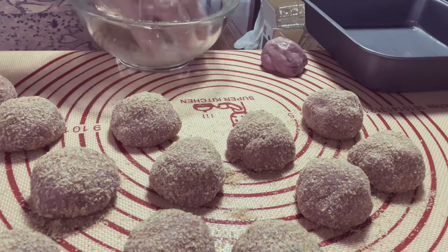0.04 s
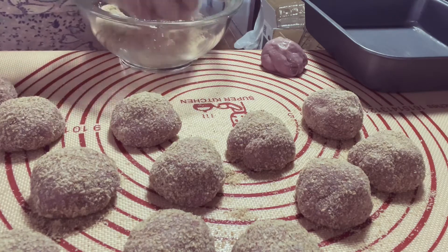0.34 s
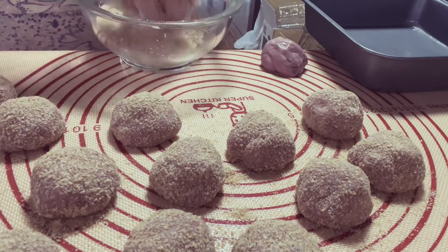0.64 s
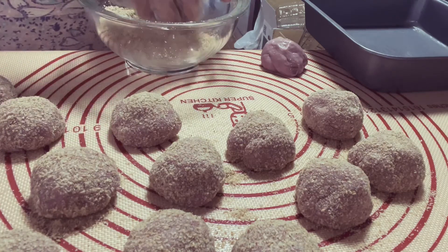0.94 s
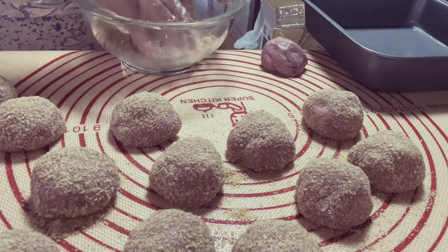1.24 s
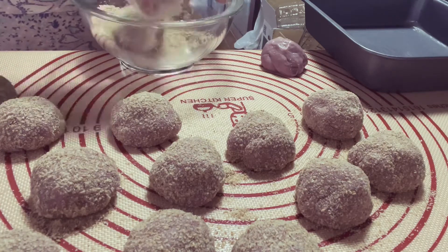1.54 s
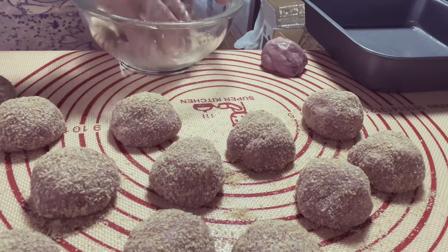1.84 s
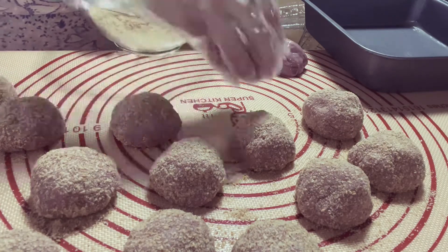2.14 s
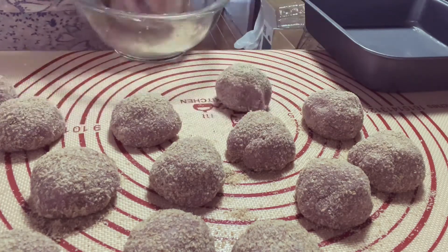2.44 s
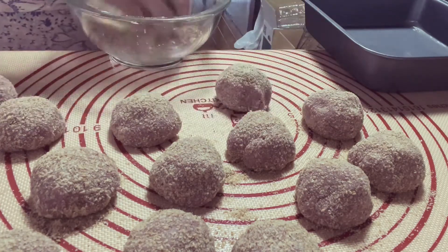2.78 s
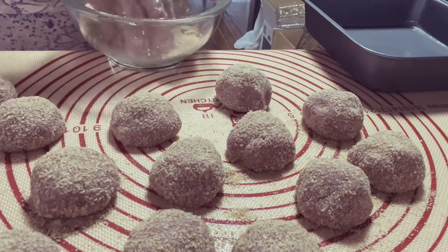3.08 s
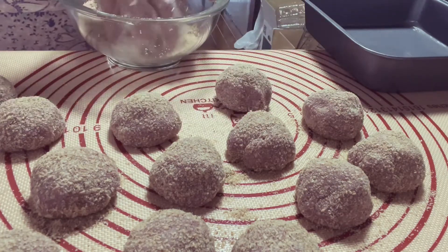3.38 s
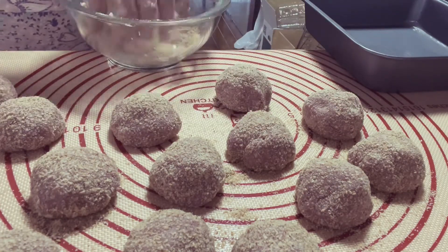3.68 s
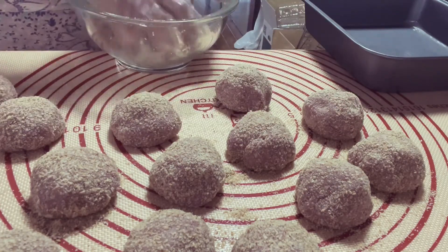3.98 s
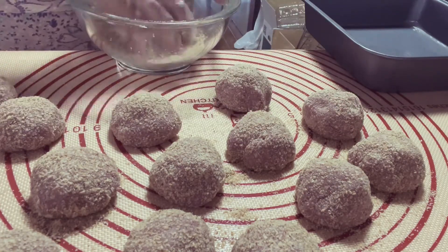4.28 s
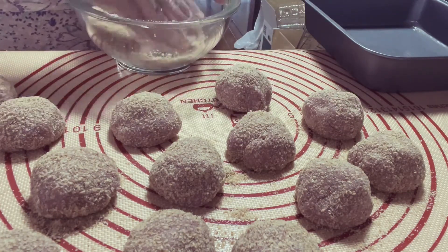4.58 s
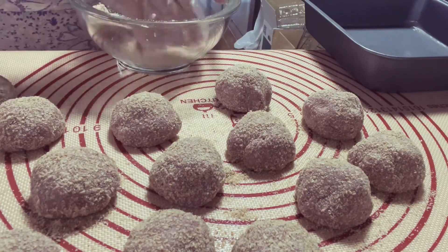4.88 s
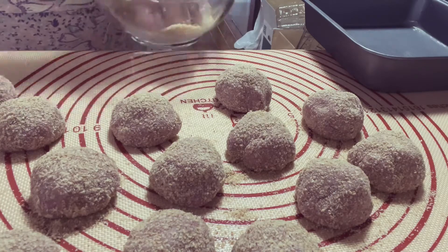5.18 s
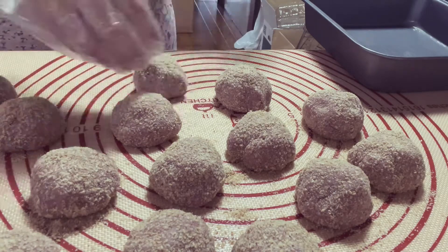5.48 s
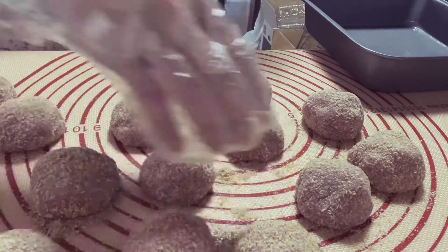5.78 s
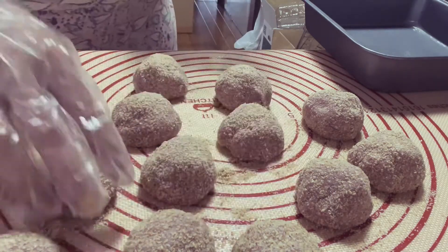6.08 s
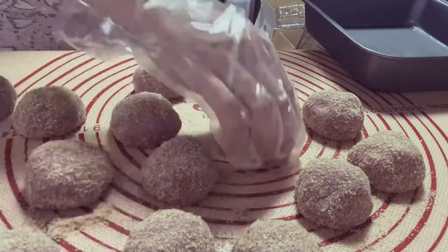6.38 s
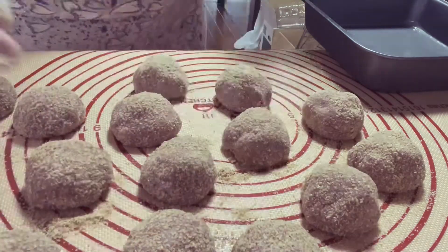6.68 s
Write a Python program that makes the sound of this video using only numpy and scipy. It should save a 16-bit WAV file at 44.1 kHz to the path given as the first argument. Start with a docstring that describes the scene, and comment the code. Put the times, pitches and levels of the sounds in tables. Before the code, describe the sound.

A quiet, close kitchen sound with almost no echo, over a faint low hum and hiss. From the start, a dough ball is rolled in dry crumbs in a glass bowl: soft, uneven hissing and grinding with tiny crunches. The bowl rocks on a baking mat, making irregular dull knocks. These cluster between about 0.3 and 1.1 seconds, with the loudest, a harder clack, at 0.7. A double bump comes at 2.1 seconds, then a small plastic glove snap and a faint glass ping around 2.4. The rubbing and gentle knocking continue until about 5.2 seconds. At 5.3 the bowl is pushed aside with a knock and a light slap, followed by a soft thud at 5.6. From 5.4 until the end, near 6.8 seconds, the thin plastic glove rustles in short bursts with crisp little crinkles and snaps.

```python
"""In a quiet kitchen, a gloved hand rolls a dough ball in breadcrumbs in a glass bowl on a baking mat.
Friction and countless tiny fractures make the crumbs hiss and crunch; a few hard ones ping the glass.
The bowl rocks and knocks dully through the mat, exciting its own damped modes and those of the table.
Then the bowl is pushed aside, and the thin plastic glove buckles and rustles as the balls are set down."""
import sys
import numpy as np
from scipy import signal
from scipy.fft import rfft, irfft
from scipy.io import wavfile
from scipy.ndimage import uniform_filter1d

SR = 44100
rng = np.random.default_rng(int(sys.argv[2]) if len(sys.argv) > 2 else 0)


def generate_wav(signal):
    """Clip the signal to [-1, 1] and save it as 16-bit WAV at the path in sys.argv[1]."""
    frames = np.transpose(np.atleast_2d(signal))
    scaled = np.clip(frames, -1, 1) * 32767
    pcm = np.round(scaled).astype(np.int16)
    wavfile.write(sys.argv[1], SR, pcm)


N = 301203
TIME, FREQS = np.arange(N) / SR, np.fft.rfftfreq(N, 1 / SR)

# pushes of the hand that roll the ball: start_s, length_s, effort_db, extra_pressure_db
PUSHES = [(0.0, 0.1, -68, -2.5), (0.1, 0.08, -74, -4), (0.183, 0.051, -62, 0), (0.25, 0.24, -68, 0),
          (0.595, 0.11, -69.5, 0), (0.72, 0.12, -67, 1.5), (0.84, 0.17, -72.5, -3.5),
          (0.885, 0.036, -66, -0.5), (0.995, 0.11, -72, 0), (1.12, 0.86, -74.5, 0.5),
          (1.475, 0.046, -61.5, 0), (1.585, 0.2, -68, -1), (1.77, 0.12, -72.5, -2.5),
          (1.96, 0.021, -66.5, 0), (2.165, 0.076, -74, 1), (2.255, .07, -67, 1.5), (2.39, 0.31, -67, -1.5),
          (2.615, .045, -63, -1), (2.72, 0.11, -66.5, -1), (2.875, 0.017, -59.5, 2),
          (2.84, 0.52, -72.5, -1), (3.385, 0.26, -70, -6), (3.488, 0.061, -65.5, 0),
          (3.655, 0.17, -65.5, -1.5), (3.845, 0.25, -69.5, 2), (4.105, 0.33, -67.5, -0.5),
          (4.45, .31, -69.5, -1.5), (4.785, 0.21, -69, -2.5), (5.06, 0.19, -75, -1)]
# faint stirring of the crumbs under the ball: start_s, length_s, effort_db, extra_pressure_db
RESTING_CONTACT = [(0, 5.7, -82.5, -2.7)]
# blows of bowl and dough on the table: time_s, thud_db, bowl_db, clack_db
BLOWS = [(0.194, -71, -63.5, -62), (0.311, -61, -59.5, -74), (0.422, -58, -53.5, -59.5),
         (0.45, -52.5, -39, -69), (0.635, -51, -39.5, -59.5), (0.7364, -48.5, -28.5, -32),
         (0.785, -53.5, -69, -74), (0.845, -50, -42, -61), (0.892, -61, -57, -68),
         (0.917, -51.5, -44.5, -63), (1.033, -52.5, -39.5, -57.5), (1.144, -57.5, -54.5, -80),
         (1.479, -54.5, -58, -65), (1.713, -57.5, -53.5, -78), (1.892, -57, -87, -66),
         (2.103, -78, -59, -73), (2.123, -50, -47.5, -70), (2.1355, -44.5, -42, -77),
         (2.243, -55, -56, -59.5), (2.408, -48.5, -54, -82), (2.635, -58.5, -59, -81),
         (2.737, -58, -52.5, -81), (2.837, -53, -54, -83), (2.892, -56.5, -89, -87),
         (2.958, -54.5, -46.5, -68.5), (3.675, -50, -48.5, -59), (3.7, -56, -50, -86),
         (3.752, -59, -66, -75), (3.882, -60, -54, -71), (4.071, -55.5, -57, -70), (4.3245, -48, -58, -83),
         (4.631, -65.5, -63, -67), (4.723, -50, -73, -65), (4.797, -55.5, -57, -66),
         (5.328, -49.5, -37.5, -56), (5.383, -51.5, -67, -60), (5.6135, -45, -68, -68),
         (5.716, -61, -78, -64)]
# modes of the table top: pitch_hz, level_db, t60_s, left_over_right_db, left_lead_rad
TABLE_MODES = [(145, -15.5, 0.044, 2, 0.41), (247.4, 4.5, 0.093, -1, -0.15), (354, 4.5, 0.059, -1.5, -0.73),
               (447, 6.5, 0.027, -14, 0.35)]
# modes of the bowl on the mat: pitch_hz, level_db, t60_s, left_over_right_db, left_lead_rad
BOWL_MODES = [(596, -11, .06, -1, 1.5), (678, 0, .105, 4, .6), (722, -17, .06, 0, -.1),
              (835, -9, .028, -4, 0), (1040, -10, .022, -4, 1.5)]
ROCK_S, SETTLED_SHARE = .0185, .45  # how long the bowl rocks; amplitude share that rings on afterwards


def amp(db):
    """Decibels to amplitude ratio."""
    return 10 ** (np.asarray(db) / 20)


def unit(x):
    """Normalisation to rms 1."""
    return x / np.sqrt(np.mean(x ** 2) + 1e-20)


def read(points, hz):
    """Interpolation on a logarithmic frequency axis."""
    f, value = np.transpose(points)
    return np.interp(np.log(hz + 1), np.log(f), value)


def add(mix, start_s, sound):
    """Superposition of a stereo sound on the mix."""
    part = mix[:, max(round(start_s * SR), 0):][:, :sound.shape[1]]
    part += sound[:, :part.shape[1]]


def colour(x, spectrum):
    """Spectral shaping that conserves the power of white input."""
    return irfft(rfft(x) * unit(amp(read(spectrum, FREQS))), N)


def noise_pair(correlation):
    """Partial coherence: left and right white noise share a common part."""
    common, independent = rfft(rng.standard_normal((2, N)))
    c = np.clip(correlation, -1, 1)
    return irfft(np.array([common, c * common + np.sqrt(1 - c ** 2) * independent]), N)


def wander(hz):
    """Low-pass noise: a slow random fluctuation of rms 1."""
    return unit(irfft(rfft(rng.standard_normal(N)) / (1 + (FREQS / hz) ** 4), N))


def grains(per_s, spread_db, clump_db, clump_hz, correlation):
    """Shot noise: tiny fractures, each a sub-millisecond burst, swelling in clumps."""
    sizes = amp(spread_db * np.minimum(rng.exponential(1, N), 5))
    arrivals = rng.random(N) < per_s / SR
    burst = np.exp(-np.arange(100) / 9)
    power = np.convolve((sizes * arrivals) ** 2, burst)[:N]
    return unit(noise_pair(correlation) * np.sqrt(power) * amp(clump_db * wander(clump_hz)))


def gestures(moves, attack_s=0.012, release_s=0.018, sag_db=1.8):
    """Envelope of sustained forcing: each move swells, sags and dies away; the strongest leads."""
    out = np.zeros(N)
    for start, length, db, *_ in moves:
        t = TIME - start
        swell = np.clip(t / attack_s, 0, 1)
        fade = np.exp(-np.maximum(t - length, 0) / release_s)
        out = np.maximum(out, swell * fade * amp(db - sag_db * np.clip(t / length, 0, 1)))
    return out


def bursts(events, rise_s):
    """Envelope of transient slips: a quick rise, then exponential decay."""
    out = np.zeros(N)
    for s, db, decay_s in events:
        t = np.maximum(TIME - s + rise_s, 0)
        out += amp(db) * (1 - np.exp(-t / rise_s)) * np.exp(-t / max(decay_s, .001))
    return out


def kitchen_noise(murk_db=-64.48, air_db=-77, swell_db=1.55):
    """Ambient noise: a slowly swelling low murmur, most coherent in the bass, and a faint even hiss."""
    # spectrum of the murmur: frequency_hz, density_db
    murk_spectrum = [(18, -88), (30, -33), (136, -14.5), (189, -3), (302, -0.5), (329, -10), (392, -1.5),
                     (482, -1), (604, -7.5), (648, -10), (694, -4), (885, -8), (1070, -2.5), (1250, -13.5),
                     (1900, -15), (2470, -97), (4180, -120)]
    # coherence of left and right: frequency_hz, correlation
    coherence = [(40, 0.69), (130, 1), (300, 0.82), (640, 0.77), (1400, 0.46), (3000, 0)]
    air_spectrum = [(1000, -7), (2300, 7.5), (3600, 8.0), (4500, 1.5), (9000, -8.0), (15000, -42.0)]
    murk = colour(noise_pair(read(coherence, FREQS)), murk_spectrum) * amp(swell_db * wander(0.56))
    air = colour(noise_pair(0), air_spectrum)
    return amp(murk_db) * murk + amp(air_db) * air


def moving_contact(x, patchy_db):
    """Time-varying filtering: as the contact patch moves, the colour of the rubbing shifts."""
    spectra = signal.stft(x, SR, nperseg=256)[2]
    patches = rng.standard_normal(spectra.shape[1:])
    for size, axis in ((4, 0), (6, 0), (4, 1), (6, 1)):  # smooth over frequency, then time
        patches = uniform_filter1d(patches, size, axis)
    return signal.istft(spectra * amp(patchy_db * unit(patches)), SR, nperseg=256)[1][:, :N]


def bowl_resonance(x):
    """Forced resonance: the glass and the air in the bowl favour a few narrow bands."""
    # resonances driven by the rubbing: centre_hz, width_hz, lift_db
    peaks = [(671, 61, 15), (2660, 60, 4.5), (3610, 140, 3.5), (4155, 80, 2.5), (5740, 140, 3.5),
             (6600, 270, 5.5), (10900, 700, 3)]
    lift_db = sum(db / (1 + (2 * (FREQS - hz) / width) ** 2) for hz, width, db in peaks)
    return irfft(rfft(x) * amp(lift_db), N)


def crumbs(hiss_db=1.24, grind_db=-1.0, crunch_db=-5, crunch_hiss_db=-6):
    """Friction and brittle fracture: loose crumbs hiss on the glass, pressed ones grind lower."""
    # crumbs giving way under the ball: time_s, level_db, decay_s
    crunches = [(0.0862, -56.5, 0.0098), (0.197, -58, 0.0073), (0.6225, -47, 0.0038),
                (0.7257, -49.5, 0.0071), (0.7355, -57, 0.015), (1.0101, -64.5, 0.021),
                (1.593, -59.5, 0.012), (2.2408, -51, 0.0073), (2.405, -61, 0.006), (2.586, -58, 0.0051),
                (2.7567, -50, 0.0079), (3.755, -59.5, 0.021), (3.895, -53, 0.0053), (4.064, -57, 0.0079),
                (5.3815, -56, 0.0097)]
    # spectra of sliding and of pressed crumbs: frequency_hz, density_db
    hiss_spectrum = [(2200, -12), (3000, 5), (4500, -2.5), (5200, -3.5), (5700, 0.5), (6150, -5),
                     (6700, 0.5), (7300, -2.5), (9500, -0.5), (11000, 0.5), (13500, 0), (15700, -2.5)]
    grind_spectrum = [(200, -17.5), (1000, -4), (1900, -8.5), (2400, -8.5), (2750, -2.5), (3200, -2),
                      (3700, 1), (4100, -8.5), (4800, -11.5), (9000, -39)]
    moves = PUSHES + RESTING_CONTACT
    uneven = amp(.9 * wander(14))
    effort = uneven * gestures(moves)
    pressure = uneven * gestures([(s, length, db + press) for s, length, db, press in moves])
    slips = bursts(crunches, rise_s=0.0012)
    fine = grains(per_s=9000, spread_db=1.0, clump_db=.8, clump_hz=60, correlation=0.38)
    coarse = grains(per_s=110, spread_db=2, clump_db=2, clump_hz=20, correlation=0.38)
    pressed = grains(per_s=5500, spread_db=0, clump_db=1.5, clump_hz=49.3, correlation=0.42)
    hiss = (fine + .42 * coarse) * (amp(hiss_db) * effort + amp(crunch_hiss_db) * slips)
    grind = pressed * (amp(grind_db) * pressure + amp(crunch_db) * slips)
    rubbing = colour(hiss, hiss_spectrum) + colour(grind, grind_spectrum)
    return bowl_resonance(moving_contact(rubbing, patchy_db=1.9))


def scuffs(scuff_db=-19.5, roll_db=-2, lead_s=.007, decay_s=.014):
    """Rolling and sliding friction: the ball rumbles, and the bowl's foot scuffs the mat at each blow."""
    # spectrum of the dull rub: frequency_hz, density_db
    rub_spectrum = [(30, -46), (100, -12.5), (230, 0.5), (450, 1), (560, -5), (680, 0), (800, -6),
                    (1100, -14), (1500, -10.5), (2500, -46)]
    slides = bursts([(s - lead_s, max(thud, bowl), decay_s) for s, thud, bowl, _ in BLOWS], rise_s=0.0046)
    rolling = gestures(PUSHES + RESTING_CONTACT)
    return colour(noise_pair(0.84), rub_spectrum) * (amp(scuff_db) * slides + amp(roll_db) * rolling)


def softened(modes, cutoff_hz):
    """Contact time acts as a low-pass filter: a longer contact leaves out the high modes."""
    return [(hz, db - 10 * np.log10(1 + (hz / cutoff_hz) ** 8), *rest) for hz, db, *rest in modes]


def ring(modes, rise_s, detune, pitch=1, droop=0, settled=SETTLED_SHARE, bass_lag=0):
    """Free vibration of damped modes, detuned by the hand's load and drooping as the bowl settles."""
    t = np.arange(SR // 6) / SR
    side = np.array([[.5], [-.5]])
    out = np.zeros((2, len(t)))
    glide = pitch * (1 - droop * (1 - np.exp(-(t / ROCK_S) ** 2)))
    clock = np.cumsum(glide) / SR
    for k, (hz, db, t60, pan_db, lead) in enumerate(modes):
        phase = 2 * np.pi * hz * (1 + detune * rng.standard_normal()) * clock
        # the soft mat slows the attack; with bass_lag, most for the lowest mode
        attack = 1 - np.exp(-(t / rise_s * (hz / modes[0][0]) ** bass_lag) ** 2)
        decay = np.exp(-np.log(1000) * t / t60)
        out += (-1) ** k * amp(db + side * pan_db) * attack * decay * np.sin(phase + side * lead)
    out *= settled + (1 - settled) / (1 + (t / ROCK_S) ** 10)  # the mat chokes the ring
    return out / np.sqrt(np.mean(out[:, :SR // 50] ** 2))  # rms 1 over the first 20 ms


def knocks(bowl_db=0.5, clack_db=3.0, lead_s=0.0018, soft_db=-58, stiff_db=-31.5):
    """Impact excitation of table and bowl: a harder blow has a shorter contact and a brighter clack."""
    # modes a hard blow reaches: pitch_hz, level_db, t60_s, left_over_right_db, left_lead_rad
    clack_modes = [(345, -3, .07, -4, -.5), (458, 1, .07, -3, 1.5), (605, -1.5, .055, 0, .5),
                   (840, -1, .05, -2, -.9), (1016, 2.5, .06, -8, 1.3), (1105, -3, .04, -4, 2.4),
                   (1215, 2.5, .06, -3, 1.6), (1390, -7, .04, 0, 1), (1520, -6, .085, 7, .5),
                   (1610, -8.5, .075, -3, .8), (1840, -12, .045, 0, -1.2), (1970, -11, .04, 0, -1.2),
                   (2170, -19, .03, 0, 2), (2400, -24, .025, 0, 1)]
    out = np.zeros((2, N))
    for s, thud, bowl, clack in BLOWS:
        clack_cutoff_hz = 1100 * 2 ** (max(clack - soft_db, 0) / 22)  # an octave per 22 dB
        thud_cutoff_hz = 410 * 2 ** ((bowl - thud) / 50)  # dough alone thuds lower
        squeeze = amp(clack - stiff_db)  # a squeezed mat raises the bowl's pitch and chokes it more
        rocking = ring(BOWL_MODES, rise_s=.0055, detune=.004, pitch=1 + .03 * squeeze, droop=.03,
                       settled=SETTLED_SHARE / (1 + squeeze))
        thudding = ring(softened(TABLE_MODES, thud_cutoff_hz), rise_s=0.0054, detune=0.04)
        clacking = ring(softened(clack_modes, clack_cutoff_hz), rise_s=.0085, detune=.006,
                        droop=.1, bass_lag=.45)
        blow = amp(thud) * thudding + amp(bowl + bowl_db) * rocking + amp(clack + clack_db) * clacking
        add(out, s - lead_s, blow)
    return out


def nudges(per_s=9.9, level_db=-65.5, spread_db=1.9, bowl_db=-2):
    """Weak random impacts: the rolling ball bumps the bowl, more often under a firmer push."""
    out, tries = np.zeros((2, N)), 100
    activity = np.sqrt(gestures(PUSHES))
    odds = activity / np.mean(activity) * per_s * TIME[-1] / tries
    timings, strengths = rng.random((tries, 2)), rng.standard_normal((tries, 2))
    for (place, chance), (thud, bowl) in zip(timings, strengths):
        thudding = ring(softened(TABLE_MODES, cutoff_hz=336), rise_s=0.0044, detune=0.072)
        rocking = ring(BOWL_MODES, rise_s=0.0082, detune=0.011)
        bump = amp(spread_db * thud) * thudding + amp(bowl_db + spread_db * bowl) * rocking
        if chance < odds[int(place * N)]:
            add(out, place * TIME[-1], amp(level_db) * bump)
    return out


def pings():
    """Brief contact excites high modes: a hard crumb skips on the glass, and the hand damps the ring."""
    # modes of the glass wall: pitch_hz, level_db, t60_s, left_over_right_db, left_lead_rad
    glass_modes = [(3030, 7, 0.046, 4, 0.88), (4170, 12.5, 0.057, -2, -0.89), (7000, 3, .04, 0, 0),
                   (10860, 6, 0.046, 2, 0.91)]
    # strikes of hard crumbs: start_s, level_db
    strikes = [(.199, -87), (0.423, -68), (1.592, -68), (2.406, -59.5), (4.324, -69)]
    out = np.zeros((2, N))
    for s, db in strikes:
        add(out, s, amp(db) * ring(glass_modes, rise_s=0.00053, detune=0.0024))
    return out


def glove_snaps(stereo_width=0.91):
    """Snap-through and slip: a taut patch of the glove sounds briefly in its own band of noise."""
    # snaps, squeaks and a slap on the bowl: start_s, level_db, centre_hz, width_hz, rise_s
    snaps = [(2.323, -54.5, 4770, 2970, 0.0018), (5.190, -55.5, 14800, 2500, 0.0037),
             (5.3808, -60, 3070, 1200, 0.002), (5.382, -47, 1050, 600, 0.0012),
             (5.455, -60.5, 9600, 5000, 0.0053), (5.390, -54, 14700, 3000, 0.0037),
             (5.5655, -51, 14000, 2500, 0.00063), (5.596, -55.5, 8800, 4450, 0.0015),
             (5.719, -50, 9800, 3120, 0.0026), (5.719, -51, 5300, 2000, 0.0015),
             (6.095, -64, 3250, 600, 0.0067), (6.196, -64.5, 5260, 800, 0.012),
             (6.203, -66, 3280, 700, 0.014)]
    out, t = np.zeros((2, N)), np.arange(SR // 10) / SR
    freqs = np.fft.rfftfreq(len(t), 1 / SR)
    for s, db, hz, width, rise in snaps:
        band = 1 / (1 + (2 * (freqs - hz) / width) ** 4)
        mid, side = rfft(rng.standard_normal((2, len(t)))) * band
        buzz = unit(irfft(np.array([mid + stereo_width * side, mid - stereo_width * side]), len(t)))
        envelope = t / rise * np.exp(1 - t / rise)
        add(out, s, amp(db) * buzz * envelope)
    return out


def glove_rustle(crinkle_db=-3):
    """Buckling: thin plastic gives way in many small creases as the hand moves."""
    # moves over the mat, and faint stirring once out of the bowl: start_s, length_s, effort_db
    reaches = [(5.43, 0.078, -64.5), (5.555, 0.198, -65), (5.81, 0.14, -72.5), (6.232, 0.068, -63),
               (6.365, 0.044, -63.5), (6.625, 0.058, -59.5)]
    stirring = [(5.385, 1.367, -74.5)]
    # single crinkles: time_s, level_db, decay_s
    crinkles = [(5.5, -51, 0.0053), (5.829, -55.5, 0.012), (6.0736, -60, 0.015), (6.143, -53, 0.005),
                (6.2384, -53, 0.022), (6.2794, -68, 0.0073), (6.6304, -63, 0.012), (6.68, -51, 0.006)]
    # spectrum of the plastic film: frequency_hz, density_db
    film_spectrum = [(500, -7), (2300, -2), (3600, 2), (4300, -1), (5300, -1.5), (6400, -4), (7600, 2),
                     (9100, 0), (10000, 1), (11000, 0.5), (13000, -1), (15700, -1.5)]
    creases = grains(per_s=4700, spread_db=-1.3, clump_db=1.8, clump_hz=70.0, correlation=0.24)
    flexing = gestures(reaches + stirring, attack_s=0.018, release_s=0.009, sag_db=0)
    creases *= flexing + amp(crinkle_db) * bursts(crinkles, rise_s=0.0023)
    return moving_contact(colour(creases, film_spectrum), patchy_db=3.5)


def room(x, delay_s=0.0081):
    """Diffuse reverberation: each band of the reflections decays exponentially at its own rate."""
    # reverberation time of the kitchen: frequency_hz, t60_s
    decay_times = [(200, 0.11), (700, 0.11), (3000, 0.061), (12000, 0.082)]
    hz, t, spectra = signal.stft(rng.standard_normal((2, SR // 2)), SR, nperseg=256)
    decay = np.exp(-np.log(1000) * t / read(decay_times, hz)[:, None])
    tail = signal.istft(spectra * decay, SR, nperseg=256)[1]
    tail *= np.clip(np.arange(tail.shape[1]) / SR / delay_s - 1, 0, 1)  # fades in after the delay
    return signal.fftconvolve(x, tail / np.linalg.norm(tail[0]), axes=1)[:, :N]


def scene():
    """Superposition of close direct sound, weak reverberation and ambient noise."""
    blows = knocks() + nudges() + scuffs()
    rustle = crumbs() + pings() + glove_rustle() + glove_snaps()
    rustle *= amp([[-.4], [.4]])  # slightly to the right
    return blows + amp(-19) * room(blows) + rustle + amp(-14) * room(rustle) + kitchen_noise()


def record(dry):
    """Band limiting: the microphone loses the deep bass, and a steep low-pass cuts the top treble."""
    bass_cut_hz, edge_hz = 90, 15900
    thin = signal.sosfilt(signal.butter(2, bass_cut_hz, "high", fs=SR, output="sos"), dry)
    low_pass = signal.firwin(511, edge_hz, window=("kaiser", 9), fs=SR)
    return signal.oaconvolve(thin, low_pass[None], "same")


dry = scene()
out = record(dry)
generate_wav(out)
```